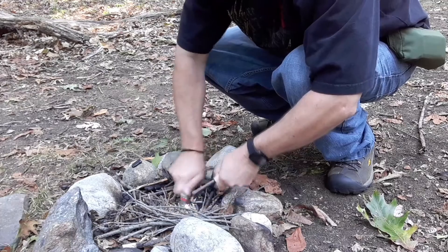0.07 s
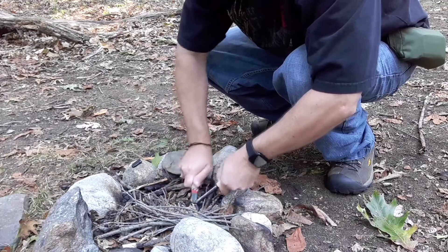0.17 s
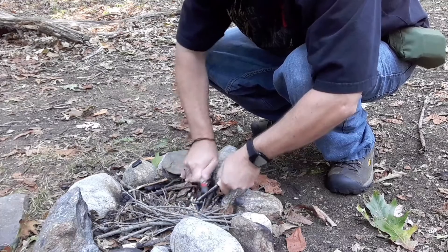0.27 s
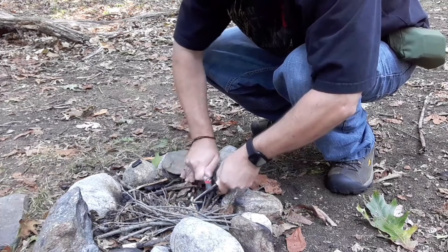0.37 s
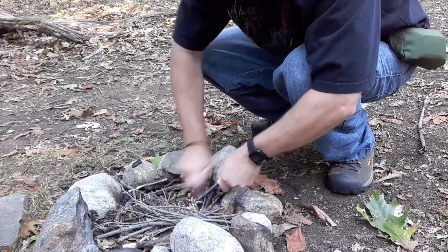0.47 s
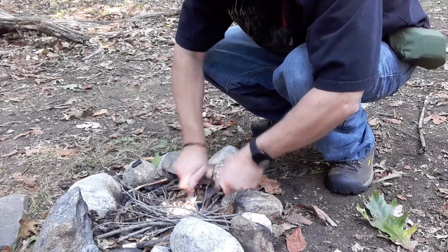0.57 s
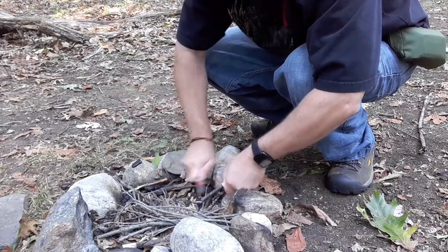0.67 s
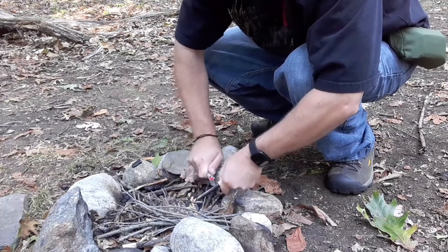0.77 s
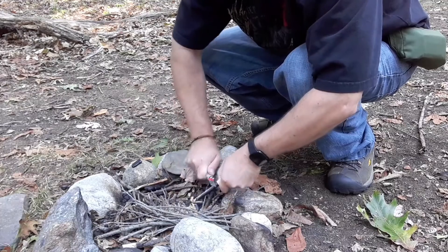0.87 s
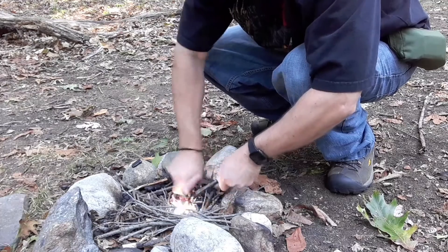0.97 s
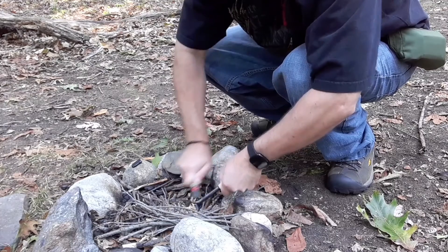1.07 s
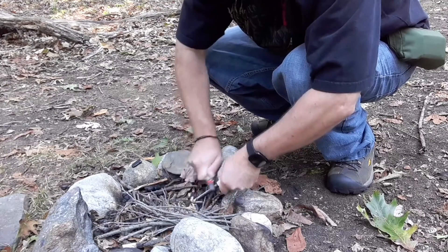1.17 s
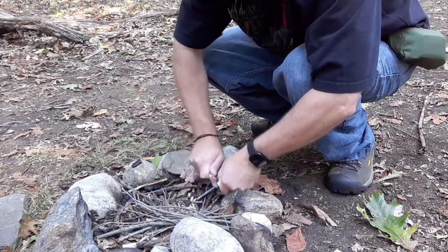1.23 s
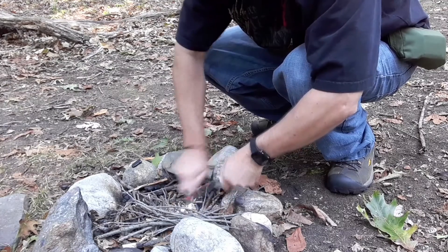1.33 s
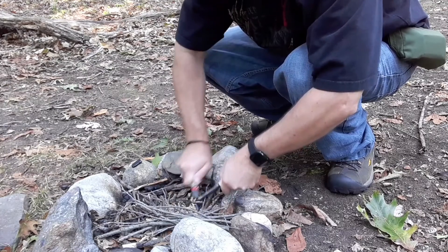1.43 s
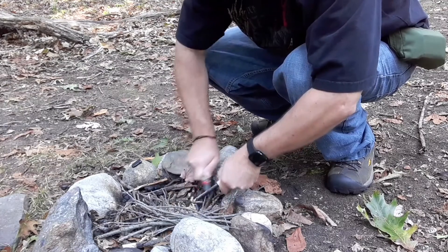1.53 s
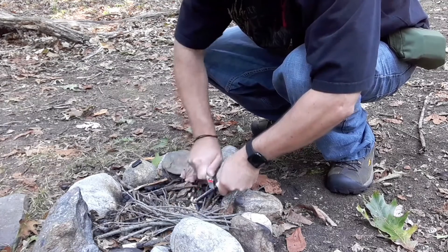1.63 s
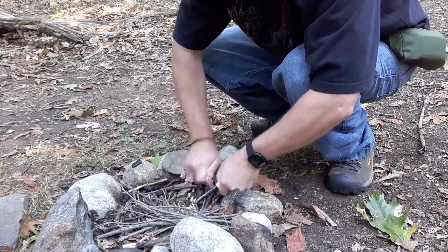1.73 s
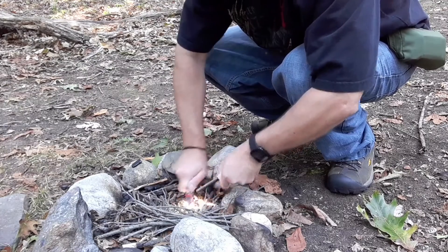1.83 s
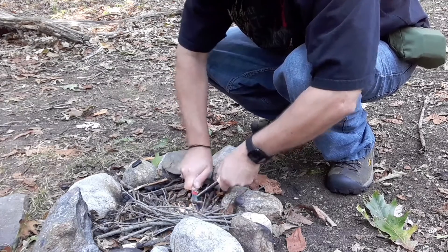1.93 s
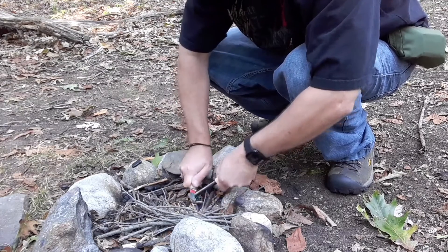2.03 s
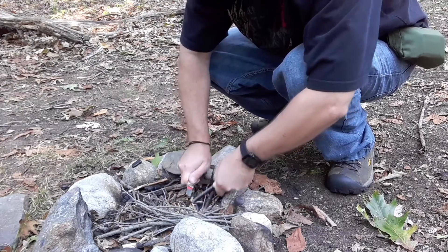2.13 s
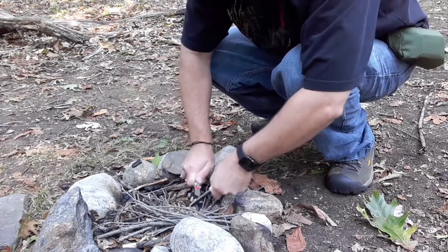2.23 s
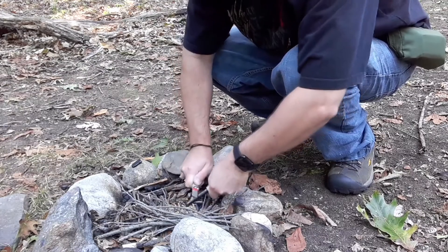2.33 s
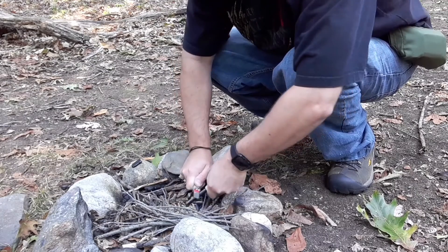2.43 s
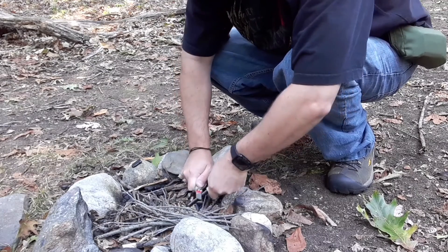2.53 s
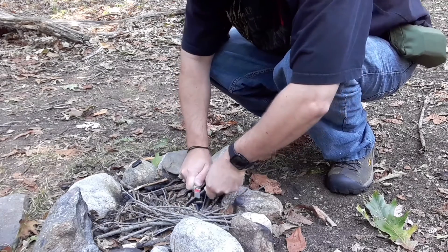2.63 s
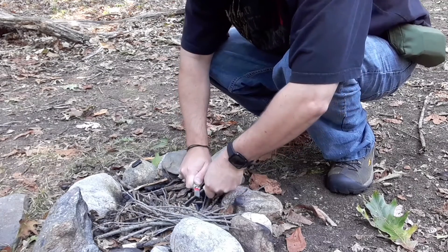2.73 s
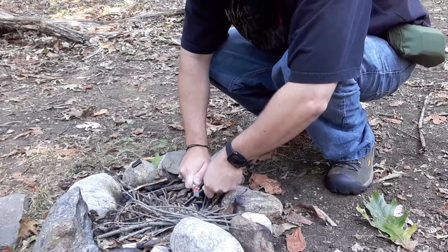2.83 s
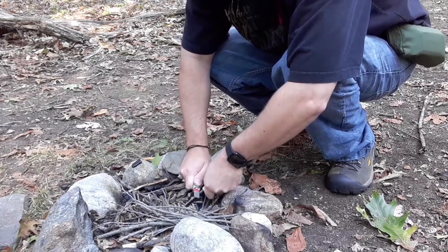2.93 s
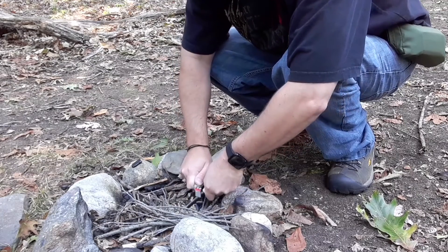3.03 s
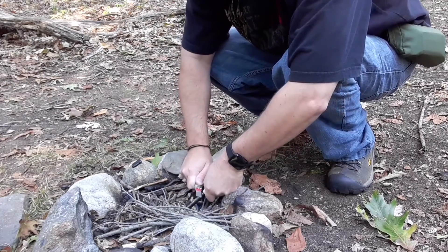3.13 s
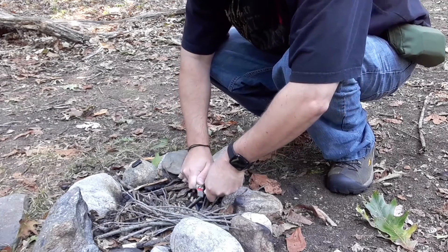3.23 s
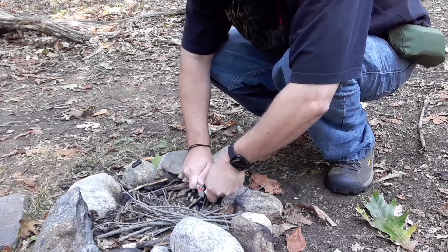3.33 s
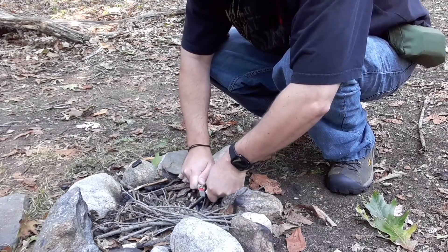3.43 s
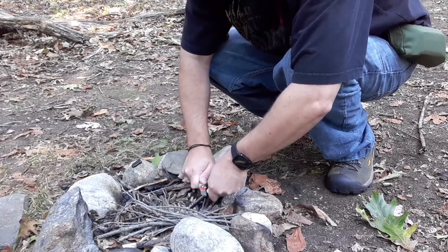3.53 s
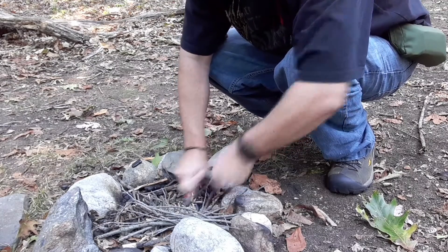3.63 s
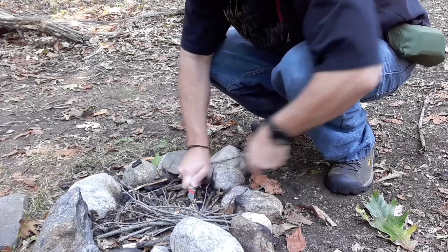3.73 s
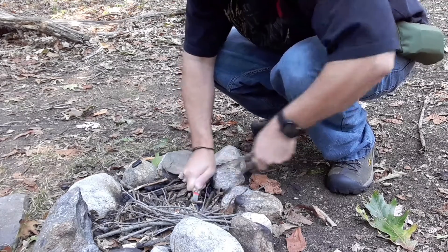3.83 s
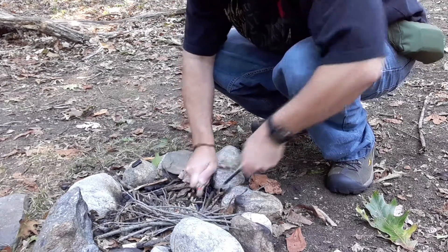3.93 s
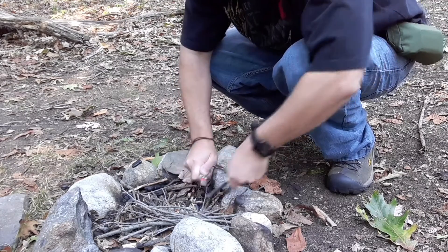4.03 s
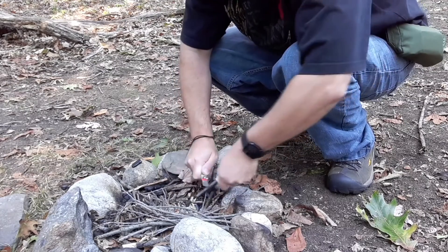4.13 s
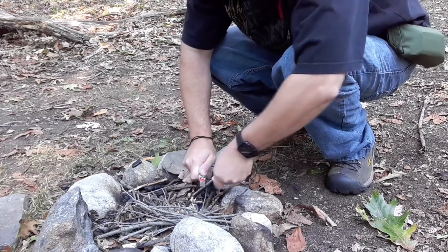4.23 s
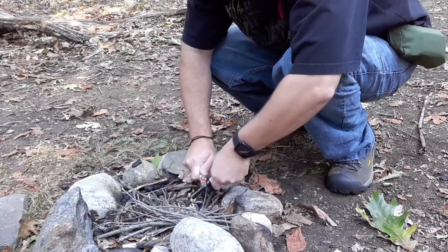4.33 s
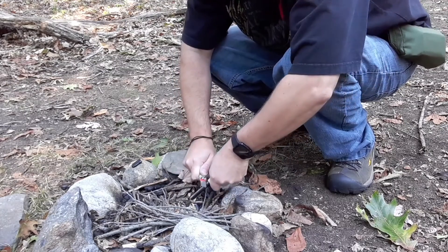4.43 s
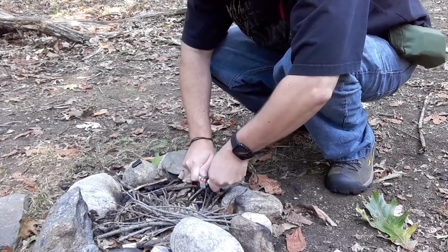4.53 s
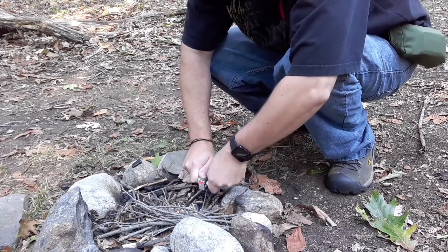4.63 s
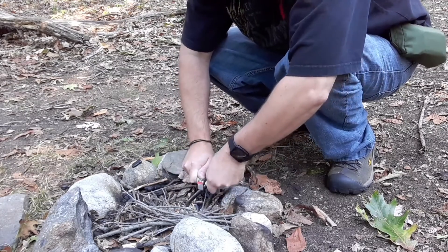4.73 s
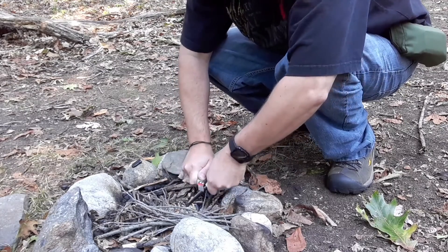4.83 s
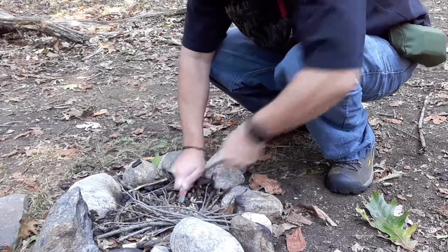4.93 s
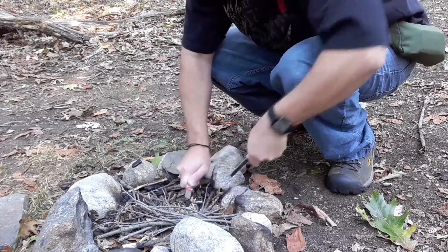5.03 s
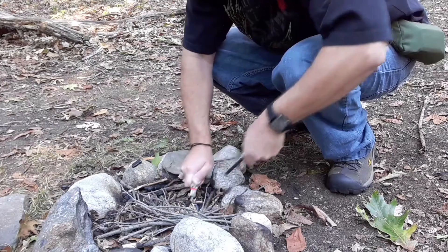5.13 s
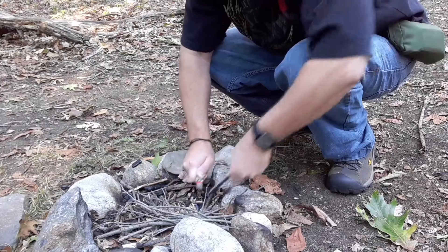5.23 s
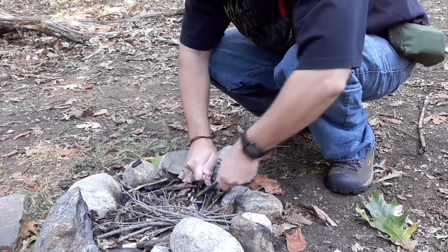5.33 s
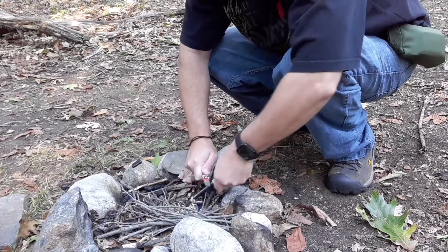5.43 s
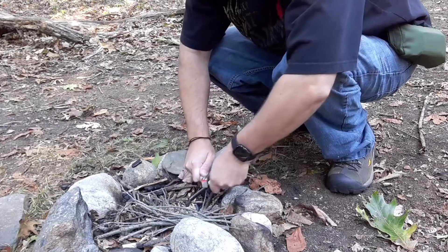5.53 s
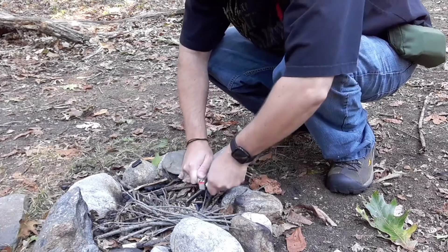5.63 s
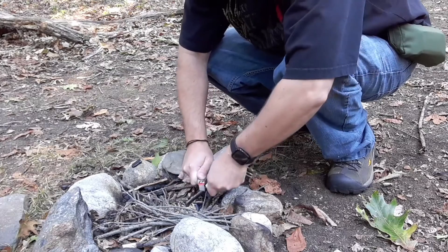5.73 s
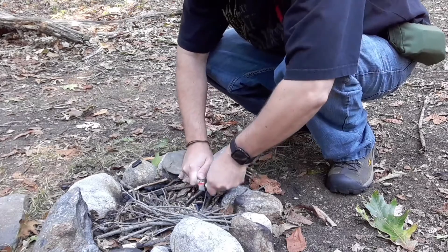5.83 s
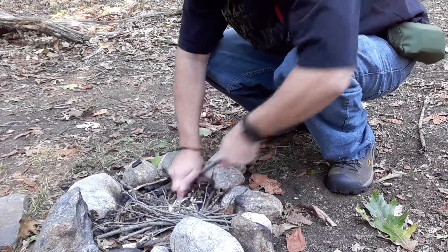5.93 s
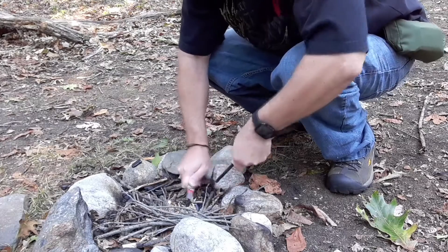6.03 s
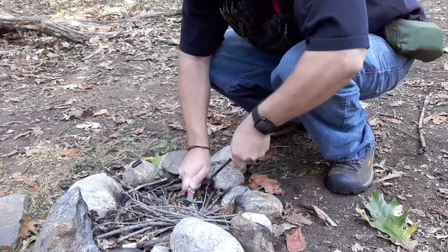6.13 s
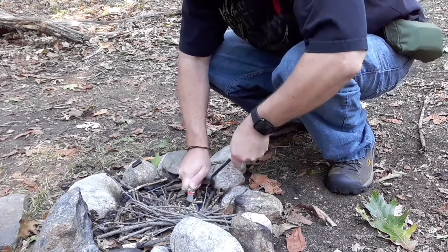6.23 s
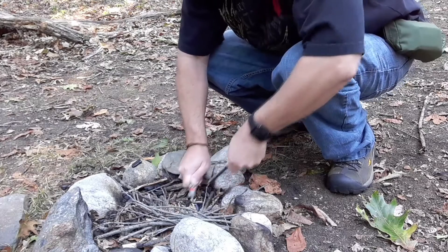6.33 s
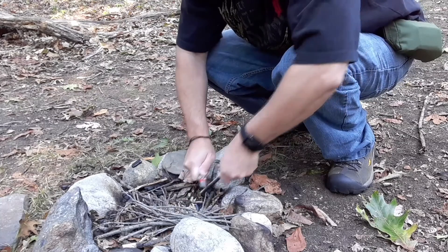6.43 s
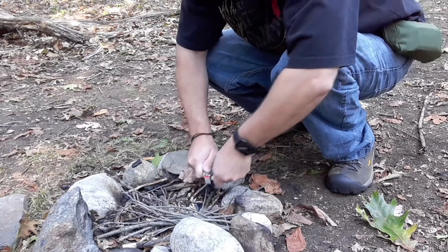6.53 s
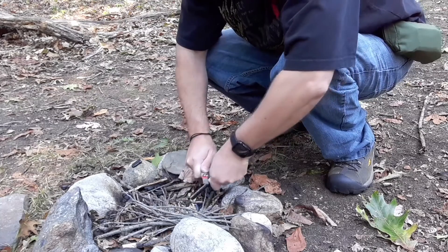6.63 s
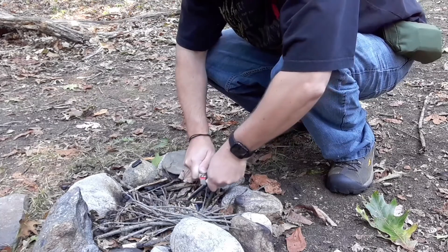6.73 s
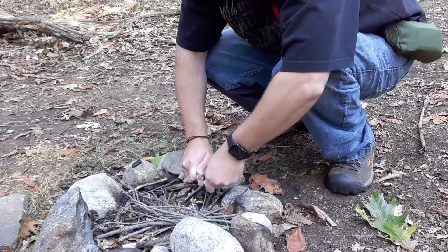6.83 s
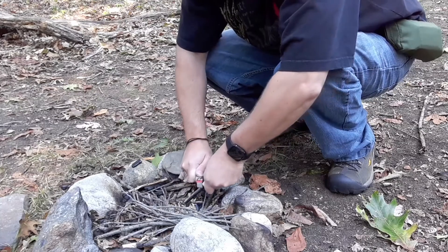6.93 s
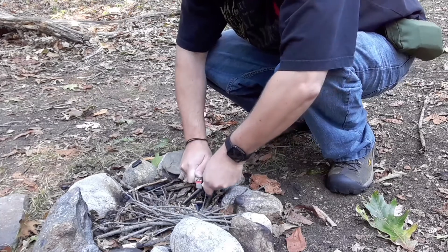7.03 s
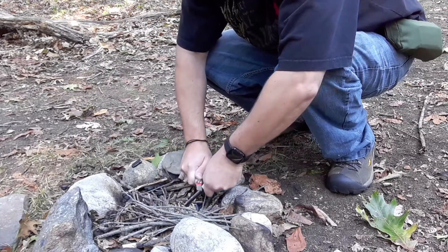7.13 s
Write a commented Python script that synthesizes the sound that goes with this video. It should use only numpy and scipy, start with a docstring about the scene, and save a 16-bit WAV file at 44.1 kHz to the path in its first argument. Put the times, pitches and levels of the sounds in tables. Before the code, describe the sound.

Quick, squealing scrapes of a steel striker on a fire rod, each trailing a sputter of sparks, while insects drone in the background.

```python
"""Eight short, squealing scrapes, each with a fizz of sparks: steel on a ferrocerium rod over a fire pit.
The edge sticks and slips, tearing off shavings that burn and pop; the fist runs on into the kindling.
Between strokes the steel taps back onto the rod, and both ring briefly in their hand-damped modes.
Crickets and katydids rub their wings all round, over a distant rumble and the soft hiss of the woods."""
import sys
import numpy as np
from scipy import signal
from scipy.fft import rfft, irfft, next_fast_len
from scipy.io import wavfile
from scipy.ndimage import map_coordinates

SR = 44100
rng = np.random.default_rng(int(sys.argv[2]) if len(sys.argv) > 2 else 0)


def transcribe(u):
    """Save the signal u as a 16-bit wav file named by the first command-line argument.

    u: samples, shape (n,) or (channels, n), limited to [-1, 1]; the rate is SR.
    q: integer samples, one column per channel.
    """
    v = np.clip(np.atleast_2d(u).T, -1, 1)
    q = np.round(v * 32767).astype(np.int16)
    wavfile.write(sys.argv[1], SR, q)


N = 317079
T = np.arange(N) / SR
FREQS = np.fft.rfftfreq(N, 1 / SR)

# Strokes down the rod; hardest press and deepest cut are placed as fractions of the length:
# start_s, length_s, press_fraction, cut_fraction, first_chatter_hz, last_chatter_hz,
# squeal_db, rasp_db, hiss_db, grunt_db, glide_db, sparks_db
STROKES = [(.008, .027, .73, .38, 1330, 1930, -11.5, -20.5, -20.5, -24, -11, -36),
           (.485, .021, 0.82, .15, 1400, 1850, -18, -30.5, -32, -35.5, -6, -35.5),
           (.935, .021, 0.77, .2, 1369, 1900, -14, -21, -23, -40, -11, -28),
           (1.327, .017, .62, .4, 1651, 1980, -14, -17.5, -15.5, -47, -17, -35.5),
           (1.78, 0.021, 0.8, .15, 1395, 1780, -14, -20.5, -21, -35, -16, -32),
           (3.630, .018, .15, .7, 1800, 1660, -15.5, -18, -16.5, -21.5, -10, -33),
           (4.882, .02, .24, .35, 1780, 1500, -16.5, -18, -16.5, -23, -16, -35),
           (5.870, 0.019, .21, .63, 1850, 1560, -13, -19, -17, -25.5, -8, -33.5)]
# Cavity resonance of the cupped hand: frequency_hz, gain_db
CUPPED_HAND = [(600, -47), (900, -27.5), (1200, -9.5), (1550, 2.5), (1850, 3.5), (2150, -4), (2400, -31),
               (3200, -47)]


def strokes(jitter=.068, slip_depth=.45, tone_db=-.7, hollow_db=-6, overtone_db=-7):
    """Stick-slip friction: the edge chatters at an audible pitch, and each slip tears off chips."""
    # Spectra of the rasp, the shaving hiss and the edge digging in: frequency_hz, gain_db
    rasp_spectrum = [(1200, -34), (2000, 5.5), (2550, -7), (3000, -5.5), (3450, -2), (4200, -6),
                     (5400, -3.5), (7500, -2.5), (9500, -12), (16000, -42)]
    shaving_spectrum = [(5000, -28), (7300, -30), (8400, 1), (9500, 2), (12300, 1.5), (14000, 3),
                        (16000, -3.5)]
    dig_spectrum = [(700, -35), (930, -13), (1130, -3), (1320, 3.5), (1600, -15), (2200, -16.5)]
    chatter_hz, squeal, rasp, hiss, dig = stroke_controls()
    phase = 2 * np.pi * np.cumsum(chatter_hz * (1 + jitter * drift(1100))) / SR
    slips = rms_one(1 + slip_depth * np.cos(phase))
    tone = from_db(tone_db) * np.sqrt(2) * np.sin(phase)
    hollow = from_db(hollow_db) * coloured(stereo_noise(.69), CUPPED_HAND)
    grunt = dig * coloured(stereo_noise(.95), dig_spectrum)
    overtones = from_db(overtone_db) * (np.sin(2 * phase) + np.cos(3 * phase))
    chips = from_db(-1.5) * coloured(slips * grit(.16, rough_db=1.5, rate_hz=1700), rasp_spectrum)
    shavings = from_db(-1) * coloured(slips * grit(.14, rough_db=4.5, rate_hz=2500), shaving_spectrum)
    metal = reflections(steel_modes(rasp * (chips + overtones) + hiss * shavings, ring_db=-6))
    return panned(squeal * (tone + hollow) + grunt, left_db=.7) + panned(metal, left_db=.9)


def stroke_controls(idle_hz=1700, hop_hz=177.4, hop_db=1.5, light_press_db=-11, shallow_cut_db=-6):
    """Contact force governs friction noise; gives chatter pitch and squeal, rasp, hiss, grunt levels."""
    bite_s, release_s, glide_rise_s, glide_t60_s = .0016, .0022, .011, .09
    chatter_hz, envelopes = np.full(N, float(idle_hz)), np.zeros((4, N))
    uneven_db = .7 * drift(300)
    for start, length, press_at, cut_at, first_hz, last_hz, *levels_db in STROKES:
        squeal_db, rasp_db, hiss_db, grunt_db, glide_db, _ = levels_db
        span = (T > start - .05) & (T < start + .12)
        t = T[span] - start
        before, after = np.minimum(t, 0), np.maximum(t - length, 0)
        bite = bell(before, bite_s) * bell(after, release_s)
        # the edge glides lightly before and after it bites
        glide = from_db(glide_db) * bell(before, glide_rise_s) * from_db(-60 * after / glide_t60_s)
        from_press, from_cut = t - press_at * length, t - cut_at * length
        # it hops along the rod, not quite evenly
        hops_db = hop_db * (np.cos(2 * np.pi * hop_hz * from_press) - 1) + uneven_db[span]
        depth = bell(from_cut, .006)
        press = np.maximum(bell(from_press, .0033), .4 * depth)  # the deepest cut squeals a little too
        squeal = np.maximum(bite, .5 * glide) * from_db(squeal_db + light_press_db * (1 - press) + hops_db)
        cut = np.maximum(bite, glide) * from_db(shallow_cut_db * (1 - depth) + .5 * hops_db)
        grunt = from_db(grunt_db) * bell(from_cut - .003, .005)  # just past the deepest cut
        envelopes[:, span] += [squeal, from_db(rasp_db) * cut, from_db(hiss_db) * cut, grunt]
        chatter_hz[span] += bite * (np.interp(t, [0, length], [first_hz, last_hz]) - idle_hz)
    return chatter_hz, *envelopes


def steel_modes(force, ring_db):
    """Modal resonance: striker and rod ring as damped oscillators under whatever excites them."""
    # Hand-damped modes: frequency_hz, bandwidth_hz, gain_db
    modes = [(3000, 79, 1), (3295, 68, -3.5), (3550, 70, -3), (5620, 150, 0), (6130, 130, 2),
             (7130, 80, -20), (8320, 72, 7), (7850, 70, -14.5), (10390, 140, 3), (12300, 220, -2)]
    out = force.copy()
    for hz, width_hz, db in modes:
        radius = np.exp(-np.pi * width_hz / SR)
        b = (1 - radius ** 2) / 2 * np.array([1, 0, -1])
        a = [1, -2 * radius * np.cos(2 * np.pi * hz / SR), radius ** 2]
        out += from_db(db + ring_db) * signal.lfilter(b, a, force + 1e-18)
    return out


def sparks(delay_s=.011, sputter_db=2.5, sputter_hz=130, crackle_db=-6):
    """Combustion noise: shavings fizz and sputter after each stroke; some pop, and dry tinder ticks."""
    # Spectra of the fizz and of a tick: frequency_hz, gain_db
    fizz_spectrum = [(300, -17), (900, -10), (1800, -7), (2600, -2.5), (5000, -1.5), (9000, -3), (13000, 3),
                     (16000, 3)]
    tick_spectrum = [(1000, -25), (2500, -15), (6000, -8), (10000, -8.5), (13000, 0), (16000, -8)]
    # Sharpest ticks of sparks and tinder: peak_s, level_db
    sharp_ticks = [(0.089, -21.5), (.5505, -27), (.5775, -30), (1.031, -35), (1.0473, -29), (1.058, -35),
                   (2.285, -38), (2.35, -36), (2.4036, -31), (2.502, -35), (2.512, -34), (2.568, -47)]
    showers = sum(swell(start + length + delay_s, rise_s=.025, t60_s=.21, db=db)
                  for start, length, *_, db in STROKES)
    sputter = from_db(sputter_db * np.clip(drift(sputter_hz), -2, 2))
    burning = 1.06 * grit(.16, rough_db=4, rate_hz=2500)
    burning += from_db(crackle_db) * rms_one(crackle(per_s=1500, spread_db=3))
    fizz = (showers + flares()) * sputter * coloured(burning, fizz_spectrum)
    pops = sum(swell(peak, rise_s=.00017, t60_s=.016, db=db) for peak, db in sharp_ticks)
    ticks = (pops + tinder()) * coloured(grit(.2, rough_db=3.5, rate_hz=1700), tick_spectrum)
    return panned(fizz + ticks, left_db=-.5)


def crackle(per_s, spread_db):
    """Shot noise: burning specks snap independently, many small and a few large."""
    sizes = from_db(spread_db * np.minimum(rng.exponential(1, N), 3.5)) * rng.choice([-1, 1], N)
    snaps = sizes * (rng.random(N) < per_s / SR)
    return snaps * (1 + .33 * rng.standard_normal((2, N)))


def flares():
    """Delayed ignition: the envelope of stray shavings that catch late and burn out."""
    # Late flares: peak_s, rise_s, level_db
    late_flares = [(.09, 0.0093, -41), (.546, 0.01, -29), (.578, .005, -41), (1.047, 0.0069, -41),
                   (1.39, .026, -40), (1.83, 0.0087, -43), (5.935, 0.009, -44.5)]
    return sum(swell(peak, rise, t60_s=.15, db=db) for peak, rise, db in late_flares)


def tinder(start_s=2.28, end_s=2.58, per_s=55, level_db=-48, spread_db=2.5):
    """An irregular impulse train: the envelope of dry tinder ticking while the hands shift."""
    slots = np.arange(start_s, end_s, 1 / per_s)
    scatter = rng.standard_normal((64, 2))
    return sum(swell(slot + .3 * late / per_s, rise_s=.0002, t60_s=.07, db=level_db + spread_db * size)
               for slot, (late, size) in zip(slots, scatter))


def taps():
    """Impact excitation: light contacts knock in the cupped hand and scratch the steel into ringing."""
    # Steel set down on the rod or dragged back up it: peak_s, t60_s, knock_db, scratch_db
    contacts = [(.135, 0.011, -41, -34), (0.2087, 0.036, -41, -45), (0.2954, 0.019, -34, -36.5),
                (.371, 0.077, -42, -48), (0.7578, 0.011, -29.5, -32), (1.137, .12, -46, -42),
                (1.153, 0.079, -27, -28.5), (1.5621, 0.074, -31.5, -37.5), (2.1044, .04, -43, -42),
                (2.254, 0.037, -43, -48), (2.363, 0.012, -36.5, -30.5), (2.409, 0.21, -46, -45.5),
                (2.571, 0.039, -48, -52), (4.1238, .015, -28, -27.5), (4.24, 0.22, -50.5, -65),
                (5.3444, .013, -36, -44), (6.5046, .017, -29.5, -33)]
    # Spectrum of the scratch: frequency_hz, gain_db
    scratch_spectrum = [(1500, -34), (2600, -13.5), (3500, 5), (5200, -0.5), (6500, -7.5), (8400, -3),
                        (10000, -7), (12000, -5), (16000, -8.5)]
    knock_level = sum(swell(peak, .00046, t60, db) for peak, t60, db, _ in contacts)
    scratch_level = sum(swell(peak, .0006, t60, db) for peak, t60, _, db in contacts)
    knock = knock_level * coloured(stereo_noise(.89), CUPPED_HAND)
    scratch = scratch_level * coloured(grit(.21, rough_db=.5, rate_hz=1100), scratch_spectrum)
    return panned(knock + steel_modes(scratch, ring_db=-4), left_db=-.5)


def kindling(delay_s=.019, puff_db=-14.5):
    """Damped contact noise: the fist nudges the kindling after each stroke; each flare adds a puff."""
    # Spectrum of the dull rustle: frequency_hz, gain_db
    rustle_spectrum = [(60, 2), (150, -9.5), (380, -3.5), (700, -10.5), (1200, -12), (3000, -27)]
    nudges = sum(swell(start + length + delay_s, rise_s=.013, t60_s=.23, db=-53.5)
                 for start, length, *_ in STROKES)
    rustle = coloured(grit(1, rough_db=3.5, rate_hz=200), rustle_spectrum)
    return (nudges + from_db(puff_db) * flares()) * rustle


def cricket_chorus(lift_db=3.8, throb_db=.73, core_hz=4000, waver_hz=55, core_db=-7):
    """Incoherent summation: far crickets blur into one band; the nearest give it a wavering core."""
    # Swelling and sinking of the chorus: time_s, level_db
    contour = [(0.0, -51), (0.88, -52), (1.14, -48.5), (1.74, -54), (2.22, -50.5), (2.54, -55),
               (2.86, -51.5), (3.48, -53), (3.96, -49), (4.31, -53.5), (4.52, -52.5), (4.77, -49),
               (5.23, -56.5), (5.71, -49), (6.13, -55.5), (6.57, -49), (6.83, -56), (7.19, -51)]
    # Spectrum of the chorus: frequency_hz, gain_db
    chorus_spectrum = [(3200, -43), (3550, -12), (3750, -5.5), (3930, 3), (4030, 0), (4200, -6.5),
                       (4450, -16.5), (4800, -29)]
    level = from_db(np.interp(T, *np.transpose(contour)) + lift_db + throb_db * drift(45))
    core = np.array([(1 + .5 * drift(50)) * sine(core_hz + waver_hz * drift(70)) for _ in range(2)])
    band = coloured(stereo_noise(.029), chorus_spectrum)
    return panned(level * (band + from_db(core_db) * rms_one(core)), left_db=1)


def crickets():
    """Stridulation: one cricket trills, another chirps five times a second; leaves scatter both."""
    # Trills of the nearer cricket: start_s
    trill_starts = [0.143, 2.692, 5.485]
    # Runs of the small cricket's chirps: first_s, last_s, level_db
    chirp_runs = [(.125, .325, -59.5), (2.215, 2.215, -61), (2.792, 4.99, -58.5), (5.2, 7.01, -58)]
    trill_s, trill_hz, trill_db, pulse_hz = .33, 4420, -52.5, 39.8
    period_s, chirp_hz, fall_hz_per_s = .2005, 5900, 21000
    trills, chirps = np.zeros((2, N))
    waver = drift(400)
    for start in trill_starts:
        wing_pulses = 2 * np.sin(np.pi * pulse_hz * (T - start)) ** 2
        level = from_db(trill_db) * gate(start, start + trill_s, edge_s=.09)
        trills += level * wing_pulses * sine(trill_hz + 30 * waver)
    for first, last, db in chirp_runs:
        for centre in np.arange(first, last + period_s / 2, period_s):
            span = slice(max(0, int((centre - .04) * SR)), int((centre + .04) * SR))
            t = T[span] - centre
            pitch_hz = chirp_hz - fall_hz_per_s * t + 110 * waver[span]  # the wing slows as it closes
            chirps[span] += from_db(db) * bell(t, .009) * np.sqrt(2) * sine(pitch_hz)
    both = from_side(trills, left_db=.5, lead_s=.00004) + from_side(chirps, left_db=7, lead_s=.00029)
    return scattering(both, near_db=-7, near_t60_s=.05, far_db=-12, far_t60_s=.4)


def katydids(far_db=-66, buzz_s=.38, wing_hz=37, wing_depth=.6):
    """Amplitude modulation: wing strokes pulse a high, dry buzz that comes and goes over fainter ones."""
    # Spectra of the far katydids, the near one and a thinner bush cricket: frequency_hz, gain_db
    far_spectrum = [(10300, -22), (11200, -6), (11800, -4), (12080, -5), (12500, -20), (13500, -17)]
    near_spectrum = [(11200, -26), (11600, -8), (11800, -1), (12060, -4), (12220, -11), (12450, -16),
                     (12900, -28)]
    thin_spectrum = [(8100, -30), (8600, -13), (8800, 0), (9100, -20), (9500, -35)]
    # Buzzes of the near katydid: start_s, relative_level_db
    near_buzzes = [(.1, -62), (1.08, -56), (1.87, -62), (3.68, -59), (4.5, -67), (6.208, -56)]
    # Buzzes of the bush cricket: start_s, end_s, level_db
    thin_buzzes = [(5.35, 5.848, -71), (6.001, 6.33, -69)]
    far = from_db(far_db) * coloured(stereo_noise(.05), far_spectrum)
    near_level = sum(from_db(db - 2) * gate(start, start + buzz_s, .051) for start, db in near_buzzes)
    wings = 1 + wing_depth * np.sin(2 * np.pi * wing_hz * T)
    near = near_level * wings * coloured(stereo_noise(.25), near_spectrum)
    thin_level = sum(from_db(db) * gate(start, end, .08) for start, end, db in thin_buzzes)
    thin = thin_level * coloured(stereo_noise(.1), thin_spectrum)
    return panned(far + near + thin, left_db=-1)


def open_air(hiss_db=-51.5, fade_db_per_s=.36, drone_hz=91.5, drone_db=-4.5):
    """Ambient noise floor: the slowly settling hiss of the woods, and a distant rumble with a drone."""
    # Spectra of the woods and the rumble: frequency_hz, gain_db
    woods_spectrum = [(100, -2), (250, -4), (550, 0), (1200, -6), (3000, -6.5), (5000, -11), (7000, -15.5),
                      (8500, -11.5), (10000, -22), (12500, -11), (16000, -21)]
    rumble_spectrum = [(12, -68.5), (20, -35), (27, -36.5), (36, -20.5), (86, -2.5), (102, -3.5),
                       (123, -8.5), (156, -9.5), (189, -14.5), (230, -17.5), (258, -23), (296, -22),
                       (400, -24.5), (520, -49), (880, -120)]
    # Rise and fall of the rumble: time_s, level_db
    contour = [(0.0, -57), (0.64, -52.5), (0.7, -57), (1.46, -56), (1.56, -50), (2.52, -54), (2.9, -47),
               (2.98, -53), (4.58, -51), (5.39, -56), (5.99, -50), (6.11, -54.5), (7.15, -54), (7.19, -59)]
    hiss = from_db(hiss_db - fade_db_per_s * T) * coloured(stereo_noise(.11), woods_spectrum)
    drone = from_db(drone_db) * (1 + .43 * drift(8.7)) * sine(drone_hz + 2.47 * drift(9.1))
    rumble_db = np.interp(T, *np.transpose(contour)) + .5 + .8 * drift(5.9)
    rumble = from_db(rumble_db) * rms_one(coloured(stereo_noise(.98), rumble_spectrum) + drone)
    return panned(hiss, left_db=1.05) + panned(rumble, left_db=2.3)


def reflections(x):
    """Comb filtering: close reflections interfere with the direct sound and ridge its spectrum."""
    # Single bounces off the ground and stones: left_delay_s, right_delay_s, gain_db
    bounces = [(.00097, 0.00082, -17.5), (.00232, 0.0031, -10), (.0039, 0.0038, -11)]
    out, samples = x.copy(), np.arange(N)
    for *delays, db in bounces:
        for side, delay in enumerate(delays):
            out[side] += from_db(db) * np.interp(samples - round(delay * SR), samples, x[side], left=0)
    return out


def scattering(x, near_db, near_t60_s, far_db, far_t60_s):
    """Diffuse reflection: quick scatter off stones and leaves, then a faint tail from the trees."""
    t = T[:SR // 2]
    near, far = rng.standard_normal((2, 2, len(t)))
    near *= from_db(-60 * t / near_t60_s) * (t > .002)
    far *= from_db(-60 * t / far_t60_s) * (t > .012)
    echoes = from_db(near_db) * near / np.linalg.norm(near[0])
    echoes += from_db(far_db) * far / np.linalg.norm(far[0])
    return x + signal.fftconvolve(x, echoes, axes=1)[:, :N]


def from_side(x, left_db, lead_s):
    """Path difference: a source on the left arrives there sooner and louder."""
    delayed = map_coordinates(x, [np.arange(N) - lead_s * SR], order=3)
    return panned(np.array([x, delayed]), left_db)


def panned(x, left_db):
    """Level difference: the left channel stands left_db above the right."""
    return x * from_db(np.array([[left_db], [-left_db]]) / 2)


def coloured(x, spectrum):
    """Source-filter shaping: give a flat excitation a spectrum, at rms 1."""
    hz, db = np.transpose(spectrum)
    gain = from_db(np.interp(np.log(FREQS + 1), np.log(hz), db, left=-80, right=db[-1]))
    size = next_fast_len(N)
    gain = np.interp(np.fft.rfftfreq(size, 1 / SR), FREQS, gain)
    return rms_one(irfft(rfft(x, size) * gain, size)[..., :N])


def grit(correlation, rough_db, rate_hz):
    """Random modulation: noise comes in tiny clumps, as when chips break away."""
    return rms_one(stereo_noise(correlation) * from_db(rough_db * np.clip(drift(rate_hz), -2, 2)))


def stereo_noise(correlation):
    """Partly coherent white noise in two channels."""
    correlation = np.clip(correlation, -.99, .99)
    mid, side = rng.standard_normal((2, N))
    mid *= np.sqrt((1 + correlation) / 2)
    side *= np.sqrt((1 - correlation) / 2)
    return np.array([mid + side, mid - side])


def drift(rate_hz):
    """Smooth random motion of rms 1."""
    knots = rng.standard_normal(N // 8)
    return rms_one(map_coordinates(knots, [T * rate_hz], order=1, mode="wrap"))


def swell(peak_s, rise_s, t60_s, db):
    """A Gaussian rise and an exponential decay."""
    out = np.zeros(N)
    span = slice(max(0, int((peak_s - 4 * rise_s) * SR)), int((peak_s + t60_s) * SR))
    t = T[span] - peak_s
    out[span] = bell(np.minimum(t, 0), rise_s) * from_db(db - 60 * np.maximum(t, 0) / t60_s)
    return out


def gate(start_s, end_s, edge_s):
    """A gate with linear ramps."""
    return np.clip(np.minimum(T - start_s, end_s - T) / edge_s + .5, 0, 1)


def bell(t, sigma_s):
    """A Gaussian pulse of height 1 at t = 0."""
    return np.exp(-.5 * (t / sigma_s) ** 2)


def sine(hz):
    """A tone whose phase is the integral of its frequency."""
    return np.sin(2 * np.pi * np.cumsum(hz) / SR)


def from_db(db):
    return 10 ** (np.asarray(db) / 20)


def rms_one(x):
    return x / np.sqrt(np.mean(x ** 2) + 1e-20)


def scene():
    """Superposition: the fire pit and its echoes add to the insects and the open air."""
    direct = strokes() + sparks() + taps() + kindling()
    fire_pit = scattering(direct, near_db=-17.5, near_t60_s=.084, far_db=-28, far_t60_s=.43)
    return fire_pit + cricket_chorus() + crickets() + katydids() + open_air()


def record(dry, ceiling=.8, left_top_db=3, right_top_hz=14500, cutoff_hz=15950):
    """Soft saturation and band limiting: peaks are rounded; the top is brighter left, duller right."""
    rounded = dry / (1 + (dry / ceiling) ** 6) ** (1 / 6)
    size = next_fast_len(N + SR // 10)
    hz = np.fft.rfftfreq(size, 1 / SR)
    spectrum = rfft(rounded, size)
    spectrum[0] *= from_db(np.interp(hz, [13500, 15200], [0, left_top_db]))
    spectrum[1] /= np.sqrt(1 + (hz / right_top_hz) ** 18)
    spectrum /= np.sqrt(1 + (hz / cutoff_hz) ** 400)
    return irfft(spectrum, size)[:, :N]


dry = scene()
out = record(dry)
transcribe(out)
```